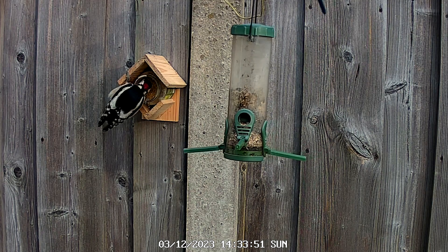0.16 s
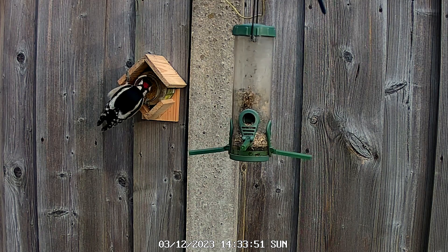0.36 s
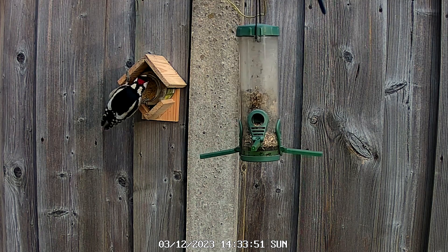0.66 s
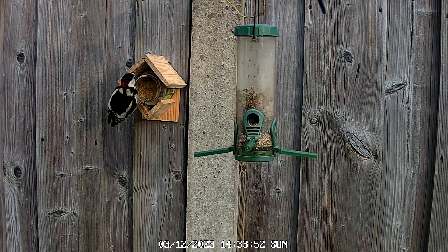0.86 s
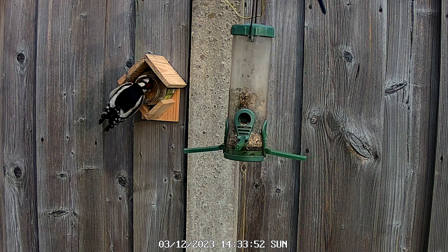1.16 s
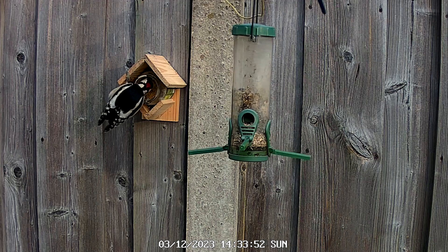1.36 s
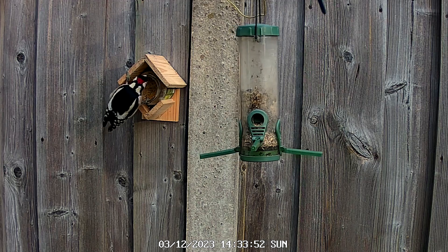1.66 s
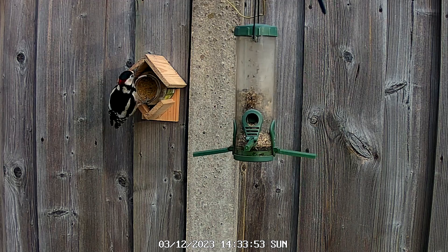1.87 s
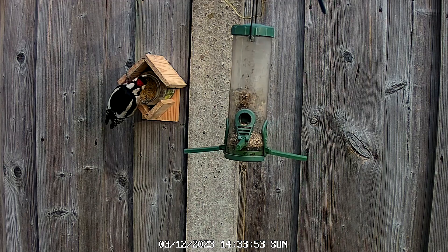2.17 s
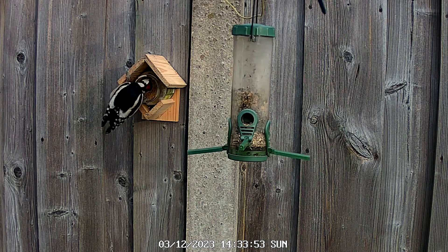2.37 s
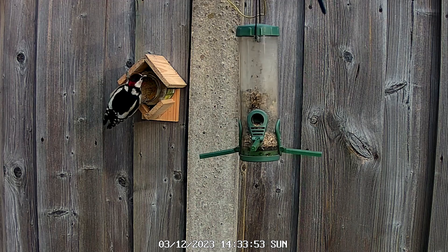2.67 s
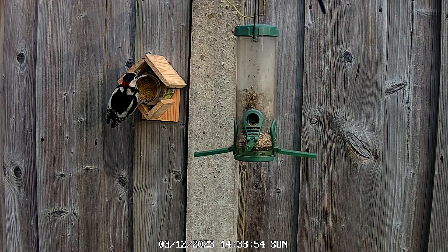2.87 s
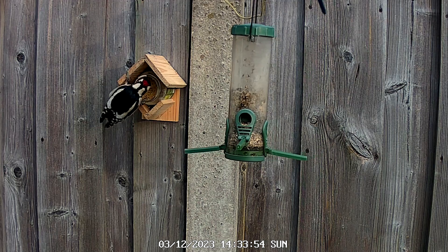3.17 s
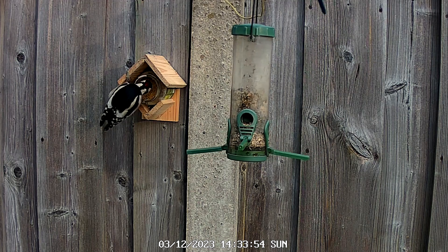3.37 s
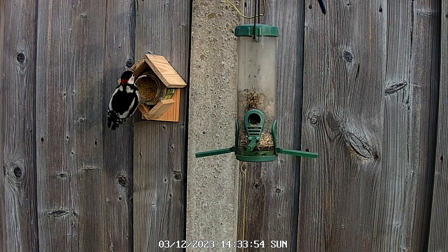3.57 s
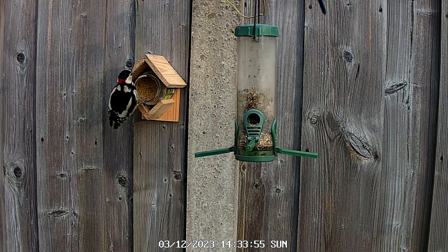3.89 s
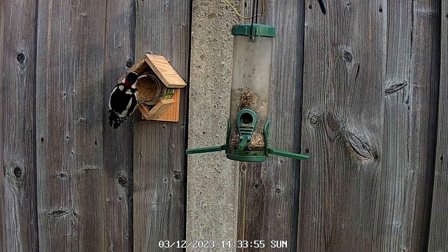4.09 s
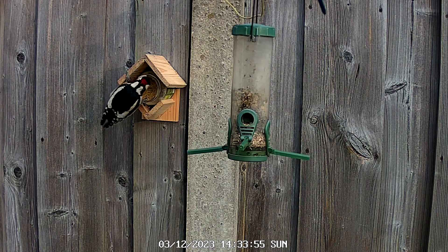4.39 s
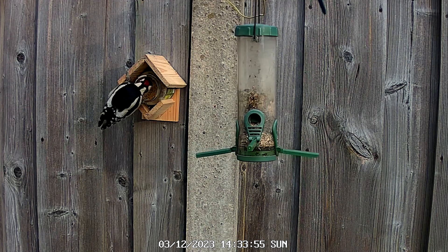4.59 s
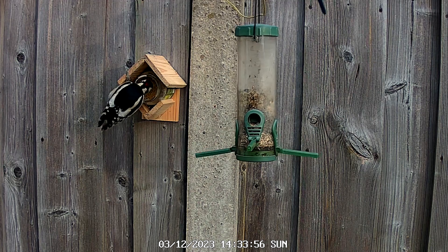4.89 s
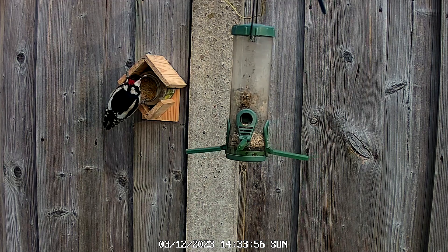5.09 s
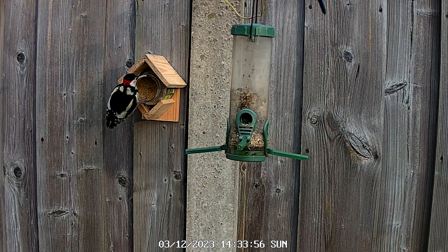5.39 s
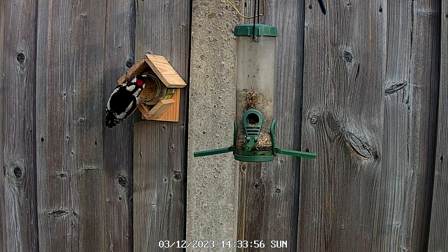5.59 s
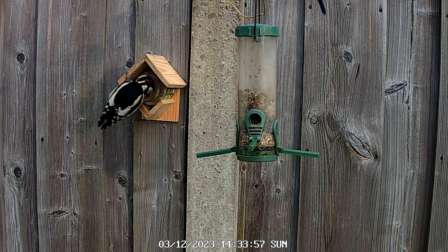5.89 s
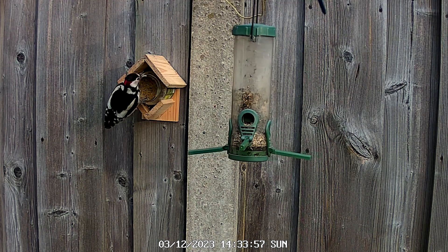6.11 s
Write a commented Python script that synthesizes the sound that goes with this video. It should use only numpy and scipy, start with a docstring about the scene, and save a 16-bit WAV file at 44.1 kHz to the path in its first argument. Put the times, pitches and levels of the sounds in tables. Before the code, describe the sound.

Faint, quick bird chatter opens over soft distant traffic rumble, followed by thin high seeps and tiny chips. A woodpecker then knocks twice quickly on a small wooden feeder, pauses, knocks again, and later strikes hardest with a bright jar clink and clattering rebound. Another thuddy peck and two very faint ones follow. Each main blow leaves a low fence boom. Outdoor garden, small camera microphone, dull top end.

```python
"""Garden birds chatter at the start, then chip, seep and rasp throughout, over traffic wash, rumble and a
passing drone; a woodpecker pecks from 1.6 s on into a jar held in a small wooden feeder on a plank fence.
Each blow rings jar, box and plank; a moment later the feeder bounces back against the fence, which booms.
Wood and jar are sums of dying sines struck by gritty pushes, with bursts of noise; the birds are wavering
whistles and pulsed noise; traffic is noise in drifting patches, the drone a low tone; a small camera hears."""
import sys
import numpy as np
from scipy import signal
from scipy.fft import rfft, irfft
from scipy.io import wavfile
from scipy.ndimage import uniform_filter1d

SR = 44100
rng = np.random.default_rng(int(sys.argv[2]) if len(sys.argv) > 2 else 0)


def bounce(signal):
    """Save signal as a 16-bit WAV file at the path given by the first command-line argument."""
    frames = np.transpose(np.atleast_2d(signal))
    limited = np.clip(frames, -1, 1)
    pcm = np.round(limited * 32767).astype(np.int16)
    wavfile.write(sys.argv[1], SR, pcm)


def elevation(decibels):
    """Turn decibel levels (scalar or array-like) into linear amplitude ratios."""
    levels = np.asarray(decibels, float)
    return 10 ** (levels / 20)


N = 275625  # length of the scene in samples


def evened(x):
    """Scales a signal to rms 1."""
    return x / np.sqrt(np.mean(x ** 2) + 1e-20)


def read(points, hz):
    """Reads a spectrum table at the given frequencies, along a log frequency axis."""
    f, value = np.transpose(points)
    return np.interp(np.log(hz + 1), np.log(f + 1), value)


def add(mix, s, sound):
    """Mixes a sound in at time s in seconds."""
    part = mix[round(s * SR):][:len(sound)]
    part += sound[:len(part)]


def wobble(size, hz):
    """Smooth random movement with rms 1 and no energy far above hz."""
    f = np.fft.rfftfreq(size, 1 / SR)
    return evened(irfft(rfft(rng.standard_normal(size)) * np.exp(-(f / hz) ** 2), size))


def ring(modes, rise, spread_db, scatter):
    """Dying modes with peak 1; where the blow lands changes their strength and phase."""
    t = np.arange(SR // 2) / SR
    luck = rng.standard_normal((len(modes), 2))
    out = np.zeros(len(t))
    for (hz, db, t60), (strength, phase) in zip(modes, luck):
        fading = elevation(db + spread_db * strength - 60 * t / t60)
        out += fading * np.sin(2 * np.pi * hz * t + scatter * phase)
    out = out * (1 - np.exp(-t / rise))
    return out / abs(out).max()


def gritty(sound, length, snap_db):
    """One push and a few ms of chatter drive the modes; the first instant is loudest."""
    t = np.arange(len(sound)) / SR
    grit = rng.standard_normal(len(t)) * np.exp(-t / length)
    drive = 0.6 * grit / np.linalg.norm(grit) + (t == 0)
    snap = elevation(snap_db * np.exp(-t / 0.0013))
    out = signal.fftconvolve(sound, drive)[:len(t)] * snap
    return out / abs(out).max()


# Noise of wood in contact, as a spectrum. Each row: frequency in Hz, relative level in dB.
CONTACT_NOISE = [(300, 10.5), (800, 12.5), (2000, -7.5), (4000, -22.5), (8000, -30.5)]


def crack(t60):
    """A dying burst of noise: the many small modes of the wood; t60 is seconds to fade by 60 dB."""
    hz = np.fft.rfftfreq(SR // 2, 1 / SR)
    t = np.arange(SR // 2) / SR
    noise = evened(irfft(rfft(rng.standard_normal(SR // 2)) * elevation(read(CONTACT_NOISE, hz))))
    return noise * elevation(-60 * t / t60) * (1 - np.exp(-t / 0.00057))


# Beak blows. Each row: start in seconds, then levels in dB of the box knock, the plank thud,
# the jar clink and the rattle of the rebound.
BLOWS = [(1.642, -36, -26, -79, -31), (1.835, -34.5, -27, -57, -45), (3.042, -43, -32, -70, -59),
         (4.2213, -28, -26, -27, -28.5), (5.12, -38, -20.5, -48, -60), (5.92, -58, -66, -77, -80),
         (5.996, -62, -44.5, -76, -75)]
# Ringing tones of the plank, the feeder box and the jar. Each row: frequency in Hz, level in dB
# before the luck of the blow, time in seconds to fade by 60 dB.
PLANK_MODES = [(109.4, 2.5, 0.1), (183.5, -6.5, 0.12), (277, -19, 0.12), (356, -20.5, 0.17)]
BOX_MODES = [(460, -10.5, .08), (594, -19.5, 0.09), (688, -1.5, 0.11), (734, -8, 0.086), (830.5, 2, 0.12),
             (1060, -20, 0.45), (1280, -24.5, 0.089), (1520, -36.5, 0.027), (1920, -21, 0.03)]
JAR_MODES = [(2880, -5, .05), (3200, -4, .07), (3350, -1, .075), (3525, -4, .09), (3700, -7, .07),
             (4000, -12, .05), (4350, -4, .035), (5400, -12, .025)]


def beak_blows():
    """Each blow sets box, jar and plank ringing at once, and stirs the loose food."""
    out = np.zeros(N)
    t = np.arange(SR // 2) / SR
    for s, knock_db, thud_db, clink_db, _ in BLOWS:
        knock = gritty(ring(BOX_MODES, 0.00013, 2.3, 1.7), 0.0013, 6.6) + elevation(-10) * crack(0.41)
        # the jar sits loosely and buzzes in its seat
        buzz = 1 + 0.6 * wobble(len(t), 200) * np.minimum(t / 0.006, 1)
        clink = gritty(ring(JAR_MODES, 0.0003, 1.5, 1.3) * buzz, 0.0027, 7.2)
        # the thud makes loose food jump and hiss
        seeds = rng.standard_normal(len(t)) * elevation(-40 - 60 * t / 0.099)
        # a short noise swells just before each blow: a burst played backwards
        lead_in = crack(0.057)[1100::-1]
        add(out, s - len(lead_in) / SR, elevation(knock_db - 12.5) * lead_in)
        add(out, s, elevation(knock_db) * knock)
        add(out, s, elevation(clink_db) * clink)
        add(out, s, elevation(thud_db) * seeds)
        add(out, s, elevation(thud_db) * ring(PLANK_MODES, 0.0087, 0.57, 0.05))
    return out


# Further bumps of the feeder on the fence. Each row: start in seconds, rattle level in dB,
# fence boom level in dB.
EXTRA_BUMPS = [(1.619, -54, -38.5), (4.326, -30.5, -24.5), (5.198, -64, -29.5), (5.333, -60.5, -40)]
# each blow swings the feeder off the fence; it comes back a moment later
REBOUND_S, REBOUND_BOOM_DB = 0.0275, -1  # the boom level is relative to the thud
# a rebound that rattles harder than usual also booms harder, by this share of the excess
USUAL_RATTLE_DB, BOOM_PER_RATTLE = -43, 0.15


def bounces():
    """Lists start in seconds, rattle dB and boom dB for every time the feeder hits the fence."""
    rows = []
    for s, _, thud_db, _, rattle_db in BLOWS:
        extra_db = BOOM_PER_RATTLE * (rattle_db - USUAL_RATTLE_DB)
        rows.append((s + REBOUND_S, rattle_db, thud_db + REBOUND_BOOM_DB + extra_db))
    return rows + EXTRA_BUMPS


# Ringing tones of the joint, which rattles, and of the fence, which booms. Each row: frequency in Hz,
# level in dB before the luck of the bump, time in seconds to fade by 60 dB.
JOINT_MODES = [(515, -14.5, 0.074), (720, 2, 0.036), (760, -1, 0.077), (986, 0, .06), (1115, 7, 0.047),
               (1286, -2.5, 0.09), (1500, 3.5, 0.023), (1700, -9, 0.086), (2023, -12, 0.035)]
FENCE_MODES = [(62, 3, 0.21), (132.1, -14, 0.32), (211.2, -16.5, 0.18), (284, -19.5, 0.14)]
BOOM_LAG_S = 0.005


def rebounds():
    """The feeder rattles against the fence, whose heavy panel then swells slowly into a boom."""
    out = np.zeros(N)
    for s, rattle_db, boom_db in bounces():
        rattle = gritty(ring(JOINT_MODES, 0.00079, 3.3, 2.88), 0.0051, 3.6) + elevation(-9.5) * crack(0.17)
        add(out, s, elevation(rattle_db) * rattle)
        # the boom pushes the opposite way
        add(out, s + BOOM_LAG_S, -elevation(boom_db) * ring(FENCE_MODES, 0.0054, 1.7, 0.13))
    return out


# Faint dry ticks. Each row: start in seconds, peak level in dB.
DRY_TICKS = [(0.1074, -40), (0.36, -41), (.425, -50), (1.126, -47), (2.409, -53), (2.726, -51), (4.19, -50),
             (4.325, -41.5), (5.226, -40.5), (5.292, -51)]


def ticks():
    """Each tick is a single smooth pulse seven samples long."""
    out = np.zeros(N)
    for s, peak_db in DRY_TICKS:
        add(out, s, elevation(peak_db) * np.hanning(7))
    return out


def whistle(hz, level_db, rough, breath_db):
    """A near sine whose strength flutters, with a wider fringe of turbulence."""
    tone = np.sin(2 * np.pi * (np.cumsum(hz) / SR + rng.random()))
    flutter = rough * wobble(len(hz), 250)
    breath = elevation(breath_db) * wobble(len(hz), 800)
    soft_ends = signal.windows.tukey(len(hz), 0.25)
    return np.sqrt(2) * elevation(level_db) * (1 + flutter + breath) * soft_ends * tone


# Chatter syllables. Each row: start in seconds, level in dB, factor on all pitches.
SYLLABLES = [(0.047, -54.5, 1.07), (0.084, -53.5, 1.02), (.174, -54, 1.01), (.364, -53.5, 1.01)]
# Steadier voices across the sweep. Each row: seconds after the syllable starts, length in seconds,
# first and last frequency in Hz before the pitch factor, peak level in dB relative to the syllable.
STEADY_VOICES = [(-.008, .063, 5077, 4990, -7), (-.003, 0.033, 5700, 6680, -2.5),
                 (.03, 0.054, 3615, 3790, -17.5)]
# one sweep speeds up to its top and holds there; frequencies are before the pitch factor
SWEEP_LOW_HZ, SWEEP_TOP_HZ, SWEEP_BEND = 3350, 6746, 2.3
SWEEP_S, SWEEP_HOLD_S = 0.027, 0.0064
# it is loudest partway up; start and end levels are relative to that peak
SWEEP_PEAK_S, SWEEP_DB, SWEEP_START_DB, SWEEP_END_DB = 0.02, 3.5, -16, -16


def chatter():
    """Rising whistled sweeps are crossed by steadier whistled voices."""
    out = np.zeros(N)
    t = np.arange(0, SWEEP_S + SWEEP_HOLD_S, 1 / SR)
    climb = np.minimum(t / SWEEP_S, 1) ** SWEEP_BEND
    sweep_hz = SWEEP_LOW_HZ + (SWEEP_TOP_HZ - SWEEP_LOW_HZ) * climb
    sweep_db = SWEEP_DB + np.interp(t, [0, SWEEP_PEAK_S, t[-1]], [SWEEP_START_DB, 0, SWEEP_END_DB])
    for s, db, pitch in SYLLABLES:
        add(out, s, whistle(pitch * sweep_hz, db + sweep_db, rough=0.25, breath_db=-18))
        for after, length, first_hz, last_hz, peak_db in STEADY_VOICES:
            u = np.linspace(0, 1, round(length * SR))
            hz = pitch * (first_hz + (last_hz - first_hz) * u)
            level_db = db + peak_db + np.interp(u, [0, 0.26, 1], [-2, 0, -4.5])
            add(out, s + after, whistle(hz, level_db, rough=0.45, breath_db=-14))
    return out


def chatter_tail():
    """The echo of an earlier chatter syllable dying away at the start: smooth noise on a high tone."""
    out = np.zeros(N)
    length_s, level_db, centre_hz, width_hz = 0.059, -58, 6140, 2100
    u = np.linspace(0, 1, round(length_s * SR))
    tail = wobble(len(u), width_hz) * np.sin(2 * np.pi * centre_hz * length_s * u)
    add(out, 0, np.sqrt(2) * elevation(level_db) * (1 - u) * tail)
    return out


# High seeps that slide down. Each row: start in seconds, length in seconds, peak level in dB,
# first and last frequency in Hz.
SLIDING_SEEPS = [(0.696, 0.11, -48.5, 8270, 7450), (1.159, 0.088, -50.5, 8100, 7360),
                 (1.704, 0.095, -55, 8160, 7380), (3.244, 0.083, -55, 7840, 7610),
                 (5.664, 0.1, -56.5, 8210, 7280), (6.067, 0.086, -65, 8100, 7780)]


def seeps():
    """A whistle slides down while swelling and fading, with hoarse air trailing above it."""
    out = np.zeros(N)
    for s, length, db, first_hz, last_hz in SLIDING_SEEPS:
        u = np.linspace(0, 1, round(length * SR))
        level_db = db + np.interp(u, [0, 0.5, 1], [-15.5, 0, -22.5])
        hz = np.interp(u, [0.23, 0.58], [first_hz, last_hz])
        add(out, s, whistle(hz, level_db, rough=0.56, breath_db=-31))
        # the hoarse air slides only half as far
        add(out, s, whistle((hz + first_hz) / 2, level_db - 7.5, rough=0.78, breath_db=-2.5))
    return out


# Short whistled chips, and high overtones that sound with two of the rasps. Each row: start in seconds,
# length in seconds, starting level in dB, first and last frequency in Hz.
CHIPS_AND_OVERTONES = [(0.051, 0.042, -59.5, 2730, 2690), (0.06, 0.013, -64, 5400, 5300),
                       (0.083, 0.027, -62, 1500, 1493), (1.039, 0.028, -66.5, 5780, 5700),
                       (1.274, 0.019, -57, 5540, 5820), (1.377, 0.026, -68.5, 5900, 5600),
                       (1.416, 0.021, -67, 3250, 3540), (1.91, 0.018, -64, 5720, 5660),
                       (2.234, 0.044, -62.5, 7230, 7290), (2.546, 0.06, -65, 7250, 7200),
                       (2.643, 0.023, -58, 4820, 4570), (2.898, 0.026, -65.5, 3220, 3520),
                       (3.74, 0.021, -67.5, 5710, 5550), (4.881, 0.01, -70, 3280, 3500),
                       (4.983, 0.042, -78.5, 5860, 5700)]


def chips_and_overtones():
    """Each chip or rasp overtone is a very short whistle that glides evenly and loses 6 dB."""
    out = np.zeros(N)
    for s, length, db, first_hz, last_hz in CHIPS_AND_OVERTONES:
        size = round(length * SR)
        hz = np.linspace(first_hz, last_hz, size)
        add(out, s, whistle(hz, np.linspace(db, db - 6, size), rough=0.4, breath_db=-12))
    return out


# Hoarse scolding rasps. Each row: start in seconds, length in seconds, level in dB,
# factor on the throat's resonant frequencies.
SCOLDING_RASPS = [(2.224, 0.055, -62.5, 1.05), (2.544, 0.057, -62, 1.06), (2.628, 0.049, -67, 1.03),
                  (3.528, 0.039, -66.5, 1.04)]
# Resonances of the throat. Each row: frequency in Hz before that factor, width in Hz, peak level in dB
# relative to the others.
THROAT = [(1680, 610, 3), (3610, 410, 5), (4220, 1100, -4), (4850, 400, -5), (5700, 3000, -9),
          (6700, 760, -9)]
RASP_PULSE_HZ, RASP_PULSE_DEPTH = 127, 0.26


def rasps():
    """Noise that pulses quickly is coloured by the resonances of a throat."""
    out = np.zeros(N)
    for s, length, db, factor in SCOLDING_RASPS:
        size = round(length * SR)
        hz = np.fft.rfftfreq(size, 1 / SR)
        throat = sum(elevation(peak_db) / (1 + (2 * (hz - factor * f) / width) ** 2)
                     for f, width, peak_db in THROAT)
        cycles = RASP_PULSE_HZ * np.arange(size) / SR + rng.random()
        pulses = 1 + RASP_PULSE_DEPTH * np.sin(2 * np.pi * cycles)
        rasp = irfft(rfft(rng.standard_normal(size) * pulses) * throat, size)
        add(out, s, elevation(db) * evened(rasp) * signal.windows.tukey(size, 0.6))
    return out


def garden(x, wall_db, scatter_db, t60):
    """One clear echo off a wall, then scattered echoes of fences and bushes."""
    t = np.arange(SR // 3) / SR
    tail = rng.standard_normal(len(t)) * elevation(-60 * t / t60) * (t > 0.004)
    taps = elevation(scatter_db) * tail / np.linalg.norm(tail)
    taps[0] = 1  # the direct sound
    taps[round(0.0125 * SR)] += elevation(wall_db)
    return signal.fftconvolve(x, taps)[:N]


def shudder():
    """Strength of the low shaking that lingers in the fence after each boom."""
    under_boom_db, rise_s, t60_s = -26.5, 0.05, 0.65
    out = np.zeros(N)
    t = np.arange(SR) / SR
    for s, _, boom_db in bounces():
        add(out, s, elevation(boom_db + under_boom_db - 60 * t / t60_s) * (1 - np.exp(-t / rise_s)))
    return out


# Spectrum shape of the traffic. Each row: frequency in Hz, relative level in dB per Hz.
TRAFFIC_SPECTRUM = [(8.8, -26.5), (15, 0.5), (38, -2), (82, -10.5), (113, -19), (327, -25.5), (364, -25.5),
                    (394, -26), (898, -29.5), (1170, -31.5), (1370, -31.5), (2530, -47.5), (6770, -52.5),
                    (8000, -57), (11200, -100), (18900, -120)]
# Low rumble of far traffic. Each row: time in seconds, level in dB before a small random drift.
RUMBLE_LEVELS = [(0, -54.5), (.35, -51.5), (.9, -56.5), (1.5, -53.5), (2.9, -53), (3.55, -55.5),
                 (4.6, -53.5), (5.1, -55), (5.6, -52), (6.25, -52)]
WASH_DB = -62.5


def traffic():
    """Far traffic wash in drifting patches over a lumpy rumble that comes and goes."""
    frames = N // 256 + 5
    hz = np.fft.rfftfreq(N, 1 / SR)
    a, b, patches = rng.standard_normal((frames, 513, 3)).T
    # smooth the patches over 14 frequency bins and 10 frames
    patches = evened(uniform_filter1d(uniform_filter1d(patches, 14, 0), 10, 1))
    swell = evened(uniform_filter1d(rng.standard_normal(frames), 40))
    cells = (a + 1j * b) * elevation(1.94 * patches + 0.28 * swell)
    noise = signal.istft(cells, nperseg=1024, noverlap=768)[1][:N]
    coloured = rfft(noise) * elevation(read(TRAFFIC_SPECTRUM, hz))
    low = 1 / (1 + (hz / 130) ** 4)  # share of the rumble
    wash = evened(irfft(coloured * (1 - low), N))
    rumble = evened(irfft(coloured * low, N))
    rumble_db = np.interp(np.arange(N) / SR, *np.transpose(RUMBLE_LEVELS)) + 0.56 * wobble(N, 5.9)
    # the shuddering fence uses the same low noise
    return elevation(WASH_DB) * wash + (elevation(rumble_db) + shudder()) * rumble


DRONE_HZ, DRONE_DB, DRONE_SAG_DB, DRONE_EDGE_DB = 89.3, -59, -4, -25.5  # sag and edge are relative
DRONE_START_S, DRONE_RISE_S, DRONE_HOLD_S, DRONE_FALL_S = 1.7, 0.34, 0.71, 0.3


def drone():
    """A passing engine far away: a narrow, unsteady low hum that swells from faint, sags and fades back."""
    t = np.arange(N) / SR
    at = np.cumsum([DRONE_START_S, DRONE_RISE_S, DRONE_HOLD_S, DRONE_FALL_S])
    db = DRONE_DB + np.interp(t, at, [DRONE_EDGE_DB, 0, DRONE_SAG_DB, DRONE_EDGE_DB])
    return elevation(db) * np.sqrt(2) * wobble(N, 14) * np.sin(2 * np.pi * DRONE_HZ * t)


def scene():
    """All sources at the microphone, as one channel."""
    feeder = beak_blows() + rebounds() + ticks()
    calls = seeps() + chips_and_overtones() + rasps() + chatter_tail()
    birds = garden(chatter(), wall_db=-2.9, scatter_db=-1.6, t60=0.25)
    birds = birds + garden(calls, wall_db=-14.5, scatter_db=-13, t60=0.2)
    return (feeder + birds + traffic() + drone())[None]


def roll_off(x):
    """The treble ends steeply here."""
    return signal.sosfilt(signal.butter(12, 8870, fs=SR, output="sos"), x)


CAMERA_RATE_HZ, EDGE_HZ = 16000, 8310


def record(dry):
    """The camera's low sampling rate mirrors the treble about half that rate; then the top is cut off."""
    high_pass = signal.butter(6, 6000, "high", fs=SR, output="sos")
    treble = signal.sosfilt(high_pass, dry)
    mirror = 2 * np.cos(2 * np.pi * CAMERA_RATE_HZ * np.arange(N) / SR)
    folded = dry + treble * mirror
    low_pass = signal.firwin(201, EDGE_HZ, window=("kaiser", 7), fs=SR)
    band = signal.oaconvolve(folded, low_pass[None], "same")
    return roll_off(band)


dry = scene()
out = record(dry)
bounce(out)
```